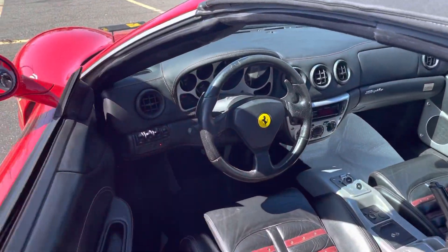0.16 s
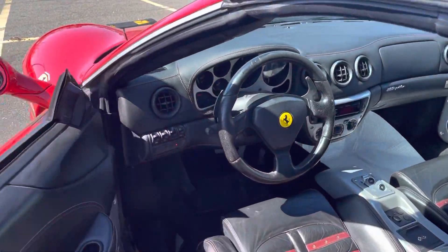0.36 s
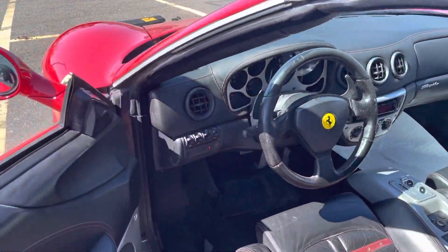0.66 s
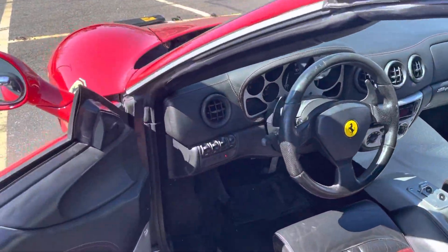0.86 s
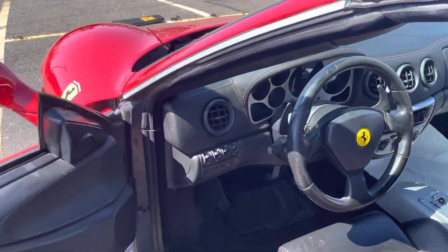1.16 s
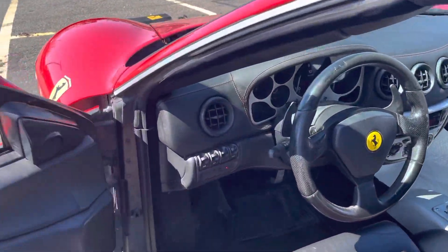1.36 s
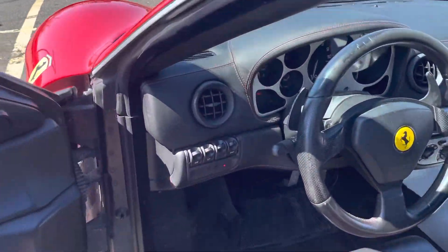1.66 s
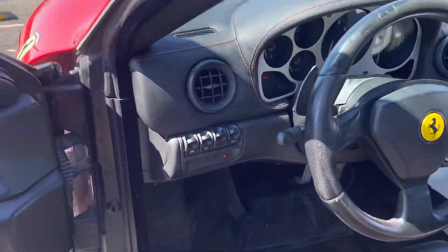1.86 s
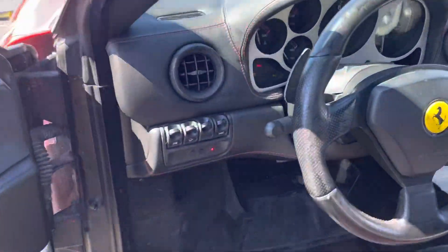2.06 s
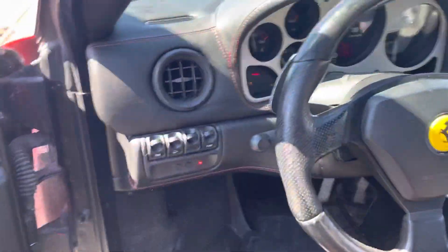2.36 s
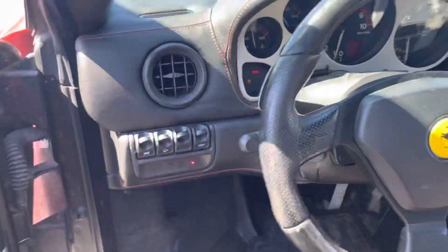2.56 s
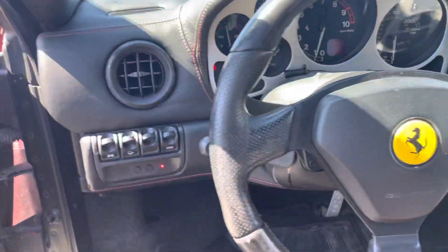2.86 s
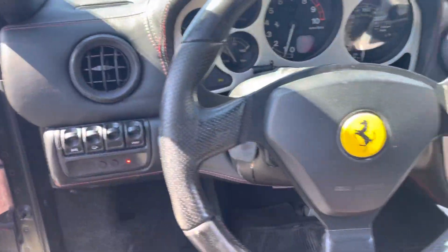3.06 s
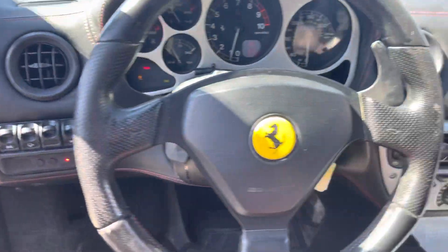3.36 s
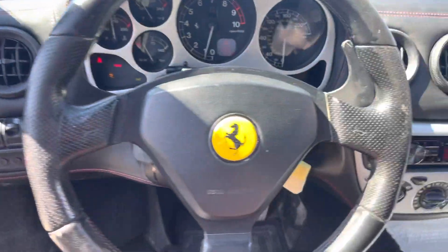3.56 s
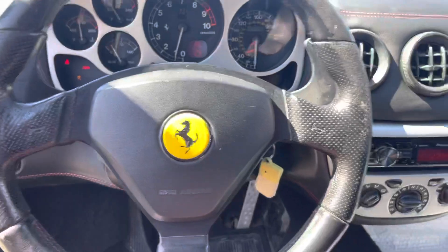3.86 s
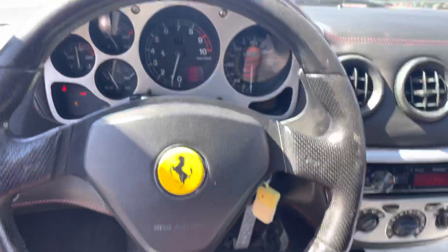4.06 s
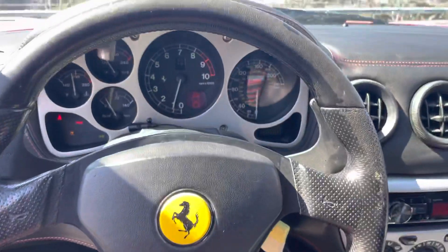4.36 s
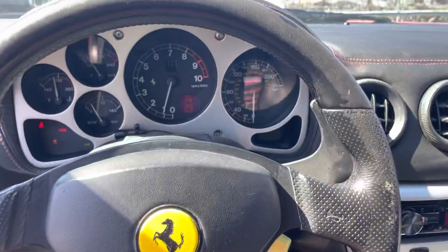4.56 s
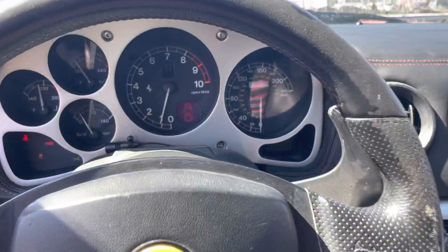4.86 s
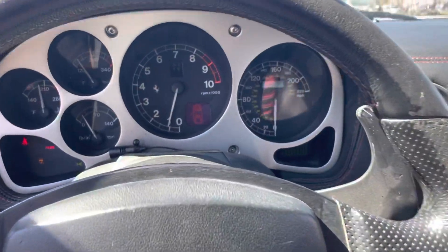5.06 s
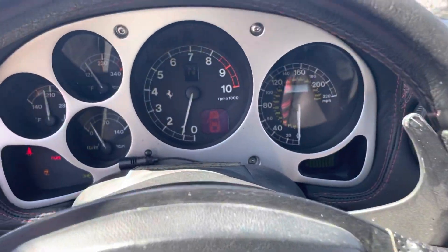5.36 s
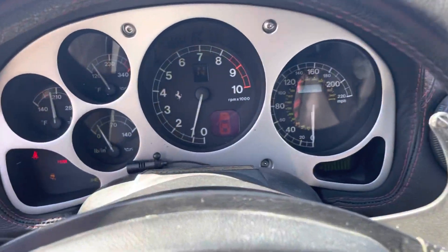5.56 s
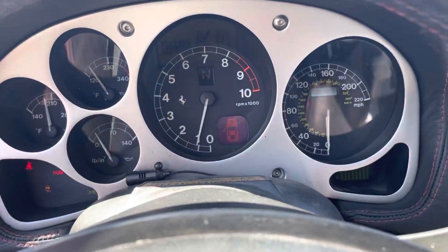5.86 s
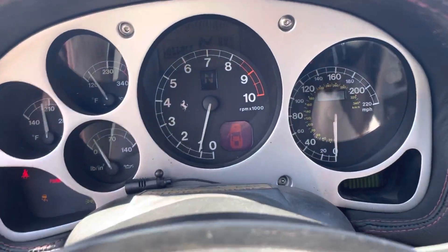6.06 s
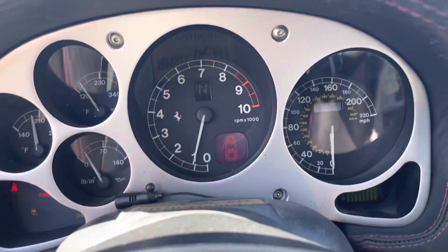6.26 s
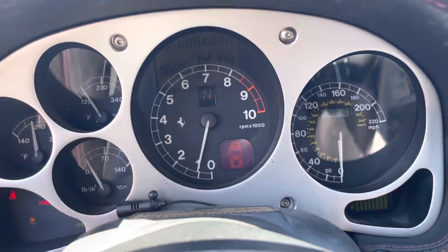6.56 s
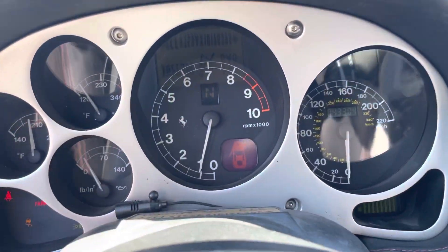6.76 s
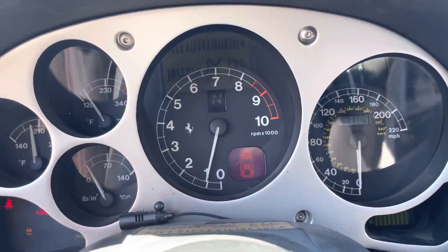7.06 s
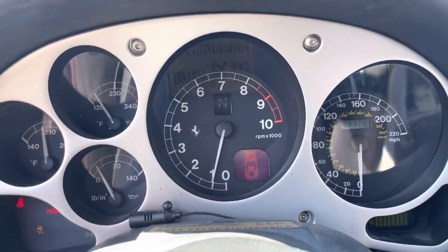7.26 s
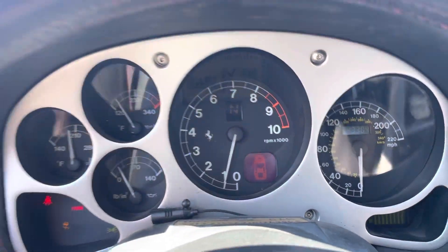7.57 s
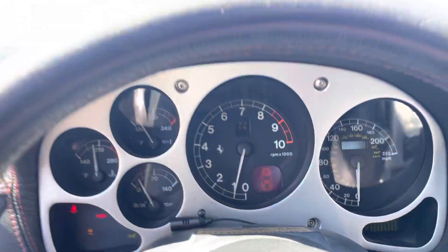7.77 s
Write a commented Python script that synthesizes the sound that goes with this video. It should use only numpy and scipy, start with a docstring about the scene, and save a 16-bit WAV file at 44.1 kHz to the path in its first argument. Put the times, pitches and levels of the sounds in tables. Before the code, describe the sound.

A sports car idles with a deep steady drone and whirring belts; wind buffets the microphone, a door clicks once, then the cabin muffles everything.

```python
"""Open parking lot: a V8 sports car idles while the microphone moves in through the opening driver's door.
Locked exhaust tones drone at the firing rate over a burble of uneven pulses; noise-made belts and valve gear
whirr in step with the engine, the covers sing as narrow resonances and a thin belt whine follows the speed.
Turbulent noise and short eddies buffet the microphone until the cabin shelters it.
The door clicks once; struck ticks, soft knocks, bumps and sleeve rustles sound close by."""
import sys
import numpy as np
from scipy import signal
from scipy.fft import rfft, irfft, next_fast_len
from scipy.io import wavfile
from scipy.ndimage import uniform_filter1d

SR = 44100
rng = np.random.default_rng(int(sys.argv[2]) if len(sys.argv) > 2 else 0)


def materialize(psi):
    """Save the field psi as 16-bit PCM at rate SR to the path in sys.argv[1].

    A 1-D psi becomes a single channel; in a 2-D psi each row is a channel.
    """
    bounded = np.clip(np.atleast_2d(psi).T, -1, 1)
    quanta = np.round(bounded * 32767).astype(np.int16)
    wavfile.write(sys.argv[1], SR, quanta)


N = 349272
TIME = np.arange(N) / SR


def from_db(db):
    """Turn decibels into amplitude gain."""
    return 10 ** (np.asarray(db) / 20)


def rms_one(x):
    """Scale to unit power."""
    return x / np.sqrt(np.mean(x ** 2) + 1e-20)


def in_time(rows):
    """Draw each column of an automation curve, sample by sample."""
    seconds, *columns = np.transpose(rows)
    return [np.interp(TIME, seconds, column) for column in columns]


def bell(s, length_s):
    """A smooth rise to 1 and back."""
    return np.exp(-(2 * (TIME - s) / length_s) ** 2)


def plateau(s, length_s):
    """A rise to 1 that holds for a while and falls back."""
    return np.exp(-(2 * (TIME - s) / length_s) ** 4 / 2)


def swells(rows):
    """Add smooth brief rises, one for each row (time [s], length [s], level [dB])."""
    return sum(from_db(db) * bell(s, length_s) for s, length_s, db in rows)


def drift(rate):
    """Slow random wander with spread 1; a higher rate [Hz] wanders faster."""
    step = 40    # the wander is drawn at every 40th sample, then joined by lines
    r = np.exp(-2 * step * np.pi * rate / SR)
    settle = 2000
    noise = rng.standard_normal(N // step + settle + 2)
    slow = signal.lfilter([1], [1, -2 * r, r * r], noise)[settle:]
    return np.interp(np.arange(N) / step, np.arange(len(slow)), rms_one(slow))


def with_diffuse(x, diffuse_db):
    """A sound shared by both ports, plus diffuse noise that differs between them."""
    return rms_one(rms_one(x) + from_db(diffuse_db) * rng.standard_normal((2, N)))


def stereo_noise(diffuse_db):
    """White noise, partly alike at the two ports."""
    return with_diffuse(rng.standard_normal(N), diffuse_db)


def colour(x, spectrum):
    """Give a signal a smooth spectrum; unit power."""
    size = next_fast_len(N)
    hz, db = np.transpose(spectrum)
    log_hz = np.log(np.fft.rfftfreq(size, 1 / SR) + 1)
    gain = from_db(np.interp(log_hz, np.log(hz), db, left=-90, right=-90))
    return rms_one(irfft(rfft(x, size) * gain, size)[..., :N])


def evened(x, even_s):
    """Hold a noise at an even strength over the given span."""
    power = uniform_filter1d(np.mean(x ** 2, axis=0), size=int(even_s * SR))
    return x / np.sqrt(power + 1e-12)


def resonate(x, hz, width_hz):
    """Two-pole resonance with gain 1 on top."""
    r = np.exp(-np.pi * width_hz / SR)
    feed = np.array([1, 0, -1]) * (1 - r * r) / 2
    feedback = [1, -2 * r * np.cos(2 * np.pi * hz / SR), r * r]
    return signal.lfilter(feed, feedback, x + 1e-18)


def sing(shaking, hz, width_hz):
    """One resonance kept ringing at an even strength."""
    ringing = resonate(resonate(shaking, hz, width_hz), hz, 4 * width_hz)
    return evened(ringing, even_s=0.089)


def pan(db):
    """Channel gains for a left-right difference; positive leans left."""
    return from_db(np.array([[db], [-db]]) / 2)


def in_cabin():
    """Share of the way in through the door, 0 to 1."""
    return np.interp(TIME, [1.8, 3.0], [0, 1])


# how far the left microphone port leads the right for sound from the car: (frequency [Hz], lead [rad])
PORT_PHASE = [(0, 0), (180, .15), (300, .9), (500, 1.6), (860, 1.75), (1120, 1.4), (1460, 2.9), (2000, 5.5),
              (2500, 6.2), (3500, 7), (5000, 6.3), (7500, 9.4), (10500, 12.6), (12500, 12.9), (14500, 15.7)]


def at_ports(x):
    """Airborne sound bends round the microphone body and reaches its ports out of step."""
    size = next_fast_len(N)
    lead = np.interp(np.fft.rfftfreq(size, 1 / SR), *np.transpose(PORT_PHASE))
    turn = np.exp(.5j * np.array([lead, -lead]))
    return irfft(rfft(x, size) * turn, size)[:, :N]


# weaker lines of the exhaust and the belt drive:
# (multiple of the firing rate [ratio], level against the firing tone's curve [dB])
OVERTONES = [(0.499, -24), (.75, -24.5), (1.248, -32), (1.5, -15.5), (2.499, -34.5), (2.75, -33.5),
             (3.001, -28), (3.25, -34), (3.499, -31), (4.5, -33), (4.999, -37.5), (5.999, -46.5),
             (6.169, -39.5), (6.5, -44.5), (6.75, -43), (8.5, -42.5)]
# cabin resonances that lift a line as it slides through: (frequency [Hz], width [Hz], lift [dB])
CABIN = [(111.8, 3.6, 8), (307, 10, 10), (460.4, 5, 6.5)]
# a clean hum two octaves above the firing tone fills the space behind the steering wheel:
# (time [s], level [dB])
HUM = [(0, -42), (3.0, -48.5), (3.5, -46.5), (3.85, -38.5), (5.0, -34.5), (5.9, -33.5), (6.5, -38),
       (7.0, -36), (7.9, -38.5)]


def drone(rate, firings, tone_db, octave_db):
    """Clean exhaust lines, locked to the firings; the weak ones waver with uneven combustion."""
    angle = 2 * np.pi * firings + 0.041 * drift(27)
    hum_db, = in_time(HUM)
    tone_level_db = tone_db + 0.97 + 0.12 * drift(1.8) + 0.15 * drift(13)
    tone = from_db(tone_level_db) * np.cos(angle)
    octave = from_db(octave_db + 2.0 + 0.18 * drift(30)) * np.cos(2 * angle + np.pi / 3)
    hum = from_db(hum_db + 0.6 * drift(6)) * np.cos(4 * angle)
    # in the cabin the boom leans to the right
    out = tone * pan(-3.0) ** in_cabin() + (octave + hum) * pan(-0.46)
    for multiple, db in OVERTONES:
        line_hz = multiple * rate
        lift_db = sum(peak_db / (1 + (2 * (line_hz - hz) / width_hz) ** 2)
                      for hz, width_hz, peak_db in CABIN)
        line = np.cos(multiple * angle + 2 * np.pi * rng.random() + .2 * drift(5))
        out = out + from_db(tone_db + db + lift_db + 1.1 * drift(8.0)) * line * pan(-0.28)
    return np.sqrt(2) * out    # the levels are RMS


# tone of the exhaust puffs: (frequency [Hz], relative level [dB])
BURBLE = [(18, -20.5), (30, -14.5), (42, -2), (60, 6), (90, -9.5), (130, 0.5), (155, -0.5), (185, -12.5),
          (230, -6.5), (270, -13.5), (315, -12.5), (350, -20), (405, -36), (520, -38.5), (900, -49.5)]


def burble(firings, tone_db, cylinder_share=0.66, level_db=-11.0):
    """No two firings are alike: each cylinder has its own strength, and chance adds to it."""
    at = np.flatnonzero(np.diff(np.floor(firings)))
    cylinders = rms_one(signal.detrend(rng.standard_normal(size=8), type="constant"))
    pulses = np.zeros(N)
    pulses[at] = cylinder_share * np.resize(cylinders, len(at)) + rng.standard_normal(len(at))
    gas = rng.standard_normal(N) * (1 + 0.17 * np.cos(2 * np.pi * firings))
    puffs = colour(with_diffuse(rms_one(pulses) + 1.2 * gas, diffuse_db=-9), BURBLE)
    # the burble follows the drone's level half way, smoothed over a second
    nearness_db = .5 * (uniform_filter1d(tone_db, size=SR) + np.median(tone_db))
    return from_db(level_db + nearness_db) * puffs * pan(-1.4)


# short echoes off the glass and trim: (delay [s], level [dB])
REFLECTIONS = [(.0031, -26), (.0068, -9.5), (0.0112, -14.5)]


def reflected(x, sway_s=0.00022):
    """Near surfaces comb the sound; the pattern shifts as the microphone sways."""
    out = x
    for delay_s, db in REFLECTIONS:
        earlier = TIME - delay_s - sway_s * drift(0.36)
        echo = np.array([np.interp(earlier, TIME, side) for side in x])
        out = out + from_db(db) * echo
    return rms_one(out)


# tone of the belts and pulleys: (frequency [Hz], relative level [dB])
WHIRR = [(150, -0.5), (400, 0), (600, 5.5), (850, 0.5), (1100, 3), (1350, -6.5), (1750, -4.5), (2300, -13),
         (3000, -16), (3800, -19.5), (5500, -44.5)]
# tone of their airy top: (frequency [Hz], relative level [dB])
HISS = [(2000, -9), (3300, 2), (5200, 4.5), (6200, 2), (7200, -13.5), (8500, -6), (10500, -4),
        (12500, -10.5), (15500, -17)]
WHIRR_DB, HISS_DB = -38, -57.5   # before screening
HISS_SCREENING = 1.13   # dB of hiss lost for each dB of screening


def engine_bay(firings, screening_db):
    """Belts and pulleys whirr and hiss; the whirr throbs at one, two and eight firings."""
    half_turn = np.pi * firings     # this throb repeats every second beat of the drone
    beat = 1 + 0.056 * np.cos(half_turn) + 0.18 * np.cos(half_turn / 4) + 0.032 * np.cos(2 * half_turn)
    whirr = colour(reflected(beat * stereo_noise(diffuse_db=2.5)), WHIRR)
    whirr = from_db(WHIRR_DB + screening_db + .5 * drift(3.6)) * whirr
    hiss = colour(stereo_noise(diffuse_db=-10.5), HISS)
    hiss = from_db(HISS_DB + HISS_SCREENING * screening_db + .5 * drift(13)) * hiss
    return whirr * pan(1.2) ** in_cabin() + hiss * pan(0.3)


# tone of the valve gear: (frequency [Hz], relative level [dB])
VALVES = [(1500, -23.5), (2150, 3.5), (2550, 0.5), (3250, -3.5), (3700, -20), (5000, -29.5)]


def valves(firings, screening_db, level_db=-56.0, screened_share=0.41, coarse_db=3.5, throb_db=-1.4):
    """Valve gear rustles coarsely in step; it also comes through the bulkhead, so is screened less."""
    half_turn = np.pi * firings
    beat_db = throb_db * (np.cos(half_turn) + np.cos(half_turn / 2) + np.cos(half_turn / 4))
    ticking = stereo_noise(diffuse_db=-1.5) * from_db(beat_db + coarse_db * drift(120))
    return from_db(level_db + screened_share * screening_db) * colour(ticking, VALVES) * pan(1.2)


# resonances of the engine covers, always faintly singing: (frequency [Hz], width [Hz], level [dB])
COVERS = [(1075, 36, -64), (1142, 6.7, -60.5), (2040, 37, -61), (2232, 26, -65.5), (2500, 74, -68.5)]
# single resonances stand out where the microphone passes through their loud spots:
# (time [s], length [s], frequency [Hz], width [Hz], level [dB], diffuse share [dB])
WHINES = [(0.664, 0.75, 1045, 46, -38.5, -0.5), (2.047, 0.27, 1125, 38, -41, -4.5),
          (2.574, 0.62, 1080, 17.5, -42.5, -11), (3.223, 0.55, 1086, 8.7, -43.5, -8.5),
          (5.132, 1, 1083, 23, -48, 0.5), (6.05, 0.57, 1090, 45, -55.5, 5),
          (7.88, 0.44, 1070, 42, -45, 0.5), (0.706, 0.32, 1970, 39, -50, 3),
          (2.33, 0.26, 2060, 8, -52, -12), (2.5, .14, 2040, 15, -57, -14),
          (3.214, 0.33, 1998, 8.2, -54.5, -15), (3.688, .2, 2026, 41, -55, -6),
          (4.203, 0.49, 1995, 20, -62, -6.5), (4.308, 0.76, 2040, 19, -60.5, -1.5),
          (7.147, 0.6, 2087, 43, -61.5, -3), (5.2, 0.92, 2204, 70, -61, -4),
          (6.16, 0.23, 4340, 190, -68, -3.5)]


def covers(firings, throb_db=2.6, slow_throb_db=0.9, cycle_throb_db=-1.0):
    """The covers sing a rough whine that throbs with the engine; now one resonance stands out, now another."""
    half_turn = np.pi * firings
    throb = rms_one(from_db(throb_db * np.cos(half_turn) + slow_throb_db * np.cos(half_turn / 2)
                            + cycle_throb_db * np.cos(half_turn / 4)))
    far = stereo_noise(diffuse_db=-6.5)
    direct, diffuse = rng.standard_normal(N), rng.standard_normal((2, N))
    out = sum(from_db(db) * sing(far, hz, width_hz) for hz, width_hz, db in COVERS)
    for s, length_s, hz, width_hz, db, diffuse_db in WHINES:
        shaking = direct + from_db(diffuse_db) * diffuse
        out = out + from_db(db) * plateau(s, length_s) * sing(shaking, hz, width_hz)
    return throb * out * pan(4.7) ** in_cabin()


# level of the belt-driven shaft's whine: (time [s], level [dB])
BELT = [(0, -52), (.8, -47), (2.0, -59), (3.4, -64.5), (3.65, -68), (4.3, -54.5), (5.0, -53.5), (5.6, -69),
        (6.1, -79)]
BELT_MULTIPLE = 18.8   # whine cycles per firing


def belt(firings, slip_cycles=0.2, flicker_db=2):
    """A thin whine that rises and sinks with the idle speed, roughened by belt slip."""
    level_db, = in_time(BELT)
    whine = np.cos(2 * np.pi * (BELT_MULTIPLE * firings + slip_cycles * drift(24)))
    return np.sqrt(2) * from_db(level_db + flicker_db * drift(8.8)) * whine


# the breeze drops behind the open door, flares briefly and dies in the cabin: (time [s], level [dB])
BREEZE = [(0, -14), (1.0, -18.5), (1.35, -24), (1.9, -28), (2.55, -20.5), (2.72, -24.5), (2.9, -26.5),
          (3.3, -31)]
# gusts on top of the breeze, scaled by the growths below: (time [s], length [s], gust strength [dB])
GUSTS = [(0.04, 0.1, 2), (0.556, 0.059, 4.5), (0.685, 0.13, 6.5), (0.816, 0.12, 7.5), (1.048, 0.15, 5.5),
         (1.225, 0.35, 4.5), (1.358, 0.062, 7), (1.547, 0.23, 7), (2.67, 0.05, 9)]
# lulls between them; a negative dip is a slight lift: (time [s], length [s], dip [dB])
LULLS = [(0.183, 0.034, 3.5), (0.47, 0.061, 2.5), (0.626, 0.036, 5.5), (0.848, 0.038, 1.5),
         (1.337, 0.051, 6), (1.487, 0.027, 20), (2.032, 0.071, -1.5), (2.224, 0.034, 2), (2.552, 0.028, 5)]
# deep tone of the wind: (frequency [Hz], relative level [dB])
RUMBLE = [(15, -22.5), (30, -19.5), (55, 5), (80, 6.5), (120, 4.5), (180, -6.5), (300, -32), (600, -48.5)]
# fluttering tone of the wind: (frequency [Hz], relative level [dB])
FLUTTER = [(80, -17.5), (160, -0.5), (250, 3.5), (320, -2.5), (420, -4.5), (560, -13.5), (750, -18.5),
           (1400, -19), (3000, -58)]
FLUTTER_DB = -11   # against the rumble, without gusts
FLUTTER_GROWTH, RUMBLE_GROWTH = 1.75, 0.27   # dB for each dB of gust


def wind(lumpy_db=2.5, choppy_db=-1.0, gust_top_hz=600):
    """Ragged turbulence at the ports: gusts raise low flutter more than rumble; the cabin shelters both."""
    breeze_db, = in_time(BREEZE)
    gust_db = sum(db * bell(s, length_s) for s, length_s, db in GUSTS)
    lull_db = sum(db * bell(s, length_s) for s, length_s, db in LULLS)
    choppy = stereo_noise(diffuse_db=0.5) * from_db(choppy_db * drift(41))
    rumble = evened(colour(choppy, RUMBLE), even_s=0.18)
    lumpy = stereo_noise(diffuse_db=2.5) * from_db(lumpy_db * drift(55))
    flutter = evened(colour(lumpy, FLUTTER), even_s=.07)
    # gusts lift only the flutter's low part
    low = signal.sosfiltfilt(signal.butter(3, gust_top_hz, fs=SR, output="sos"), flutter)
    flutter = flutter + (from_db(FLUTTER_GROWTH * gust_db) - 1) * low
    turbulence = from_db(RUMBLE_GROWTH * gust_db) * rumble + from_db(FLUTTER_DB) * flutter
    return from_db(breeze_db - lull_db) * turbulence


# single eddies that hit the microphone: (time [s], strength before the common level [dB], pitch [Hz])
BUFFETS = [(0.045, -4.5, 388), (0.05, -4, 183), (0.154, -9.5, 273), (.16, -1, 106), (0.263, -9, 202.5),
           (0.521, -9, 210), (.589, -7.5, 286), (.664, -5.5, 194), (0.67, -9.5, 366), (.69, -9, 330),
           (.708, -4, 345), (.716, -3, 110), (0.724, -2.5, 345), (0.758, -5, 343), (0.793, -4.5, 420),
           (0.808, 1, 420), (.814, 3, 244), (.862, -8, 350), (1.023, -4.5, 363), (1.04, -13, 416),
           (1.044, -3, 96), (1.059, -11, 320), (1.087, -6, 294), (1.101, -10.5, 376), (1.14, -8.5, 358),
           (1.17, -9, 282), (1.251, -12, 317), (1.295, -13.5, 344), (1.357, -10.5, 430), (1.364, -8, 255),
           (1.509, -9.5, 322), (1.518, -11, 268), (1.535, -6, 257), (1.564, -17, 129), (1.574, -11, 278),
           (1.64, -14.5, 503), (2.044, -6.5, 112.4), (2.087, -20.5, 415), (2.122, -20, 262),
           (2.137, -6, 126), (2.259, -10, 130), (2.261, -16.5, 322), (2.333, -17.5, 377), (2.356, -10, 144),
           (2.432, -6, 131), (2.449, -17, 290), (2.524, -5, 124), (2.542, -9, 205), (2.623, -14.5, 292),
           (2.671, -5, 292), (2.682, -3, 265)]


def buffets(level_db=-4.0, rise_turns=0.82, fall_turns=1.05, sag=0.081):
    """An eddy hits abruptly and shakes the pressure for about two cycles, slowing as it passes."""
    out = np.zeros((2, N))
    chances = rng.uniform(-0.94, 1, (len(BUFFETS), 2))
    for (s, db, hz), (phase, lean) in zip(BUFFETS, chances):
        near = slice(max(int((s - 4 / hz) * SR), 0), int((s + 4 / hz) * SR))
        turns = (TIME[near] - s) * hz
        envelope = np.exp(-(turns / np.where(turns < 0, rise_turns, fall_turns)) ** 2)
        eddy = envelope * np.sin(2 * np.pi * (turns - sag * turns ** 2 + phase))
        out[:, near] += from_db(db + level_db) * eddy * pan(3 * lean)
    return out


# soft low bumps while the microphone is moved: (time [s], length [s], level [dB])
BUMPS = [(4.35, 0.14, -20.5), (4.621, 0.16, -20.5), (4.743, 0.055, -15), (4.88, 0.041, -22.5),
         (6.66, 0.099, -29)]
# tone of the bumps: (frequency [Hz], relative level [dB])
BUMP = [(18, -16.5), (36, -2), (60, 6), (110, -3.5), (170, -9), (300, -34), (600, -47.5)]
# hand and sleeve brushing the trim: (time [s], length [s], level [dB])
RUSTLES = [(.52, 0.049, -51.5), (2.78, 0.65, -60), (3.815, 0.062, -49), (4.78, 0.13, -64),
           (6.12, 0.053, -64)]
# tone of the brushing: (frequency [Hz], relative level [dB])
RUSTLE = [(1000, -18.5), (3000, 4.5), (5500, -2), (10000, -10.5), (15500, -11)]


def handling():
    """Low bumps through the grip and grainy brushes against the trim."""
    thud = evened(colour(stereo_noise(diffuse_db=-11.0), BUMP), even_s=0.14)
    grains = stereo_noise(diffuse_db=-0.5) * from_db(3.6 * drift(150))
    return swells(BUMPS) * thud + swells(RUSTLES) * colour(grains, RUSTLE)


# door click, light ticks of the trim, and one short rattle:
# (time [s], onset strength before the common level [dB], centre [Hz], decay constant [s])
CLICKS = [(.691, -28, 4330, 0.0012), (0.6945, -45, 7450, 0.0025), (.7025, -44, 5000, .003),
          (.733, -41, 1900, 0.0027), (.741, -44.5, 10000, .004), (0.8185, -45, 9000, .003),
          (1.6677, -46, 7100, 0.0024), (2.0603, -49, 5400, 0.0016), (3.592, -45.5, 4500, 0.0058),
          (3.67, -50, 5000, 0.0037), (3.769, -40, 3100, 0.0035), (3.7885, -40, 3000, .002),
          (3.7945, -37.5, 4700, 0.0041), (3.818, -44, 4470, .002), (3.823, -43, 5300, 0.0027),
          (3.833, -38.5, 1650, 0.0045), (3.8335, -52, 10000, .002), (4.2475, -39, 7040, 0.0031),
          (5.047, -49, 5100, .002)]
# what the door fittings and trim ring with: (frequency [Hz], relative level [dB], 60 dB decay [s])
TRIM = [(1400, 1, 0.022), (3380, 12.5, 0.0088), (4830, 12, 0.031), (5300, 14, 0.019), (6100, 0, 0.017),
        (9400, -9, 0.0047), (11200, -8, .012)]


def clicks(tail_s=0.011, tail_db=-17, ring_db=-7, level_db=-3, diffuse_db=-5):
    """Each contact is a dry gritty crack with a brief ring of the fittings."""
    out, t = np.zeros((2, N)), TIME[:SR // 10]
    for s, db, hz, decay_s in CLICKS:
        grit = rng.standard_normal(len(t)) + from_db(diffuse_db) * rng.standard_normal((2, len(t)))
        fade = np.exp(-t / decay_s) + from_db(tail_db) * np.exp(-t / tail_s)
        crack = resonate(grit * fade, hz, hz)
        rings = sum(from_db(mode_db) * resonate(crack, mode_hz, np.log(1000) / (np.pi * t60_s))
                    for mode_hz, mode_db, t60_s in TRIM)
        hit = rms_one(crack) + from_db(ring_db) * rms_one(rings)
        at = round(s * SR)
        onset = np.std(hit[:, :SR // 500])    # the level is set on the first 2 ms
        out[:, at:at + len(t)] += from_db(db + level_db) * hit / onset
    return out * pan(0.57)


RUSH_S, RUSH_LENGTH_S, RUSH_DB, RUSH_HZ, RUSH_WIDTH_HZ = 1.61, 0.9, -42, 760, 370


def door_rush():
    """A soft hollow rush of air in the gap of the open door as the microphone passes its edge."""
    air = resonate(stereo_noise(diffuse_db=-3.0), RUSH_HZ, RUSH_WIDTH_HZ)
    air = resonate(air, RUSH_HZ, 2 * RUSH_WIDTH_HZ)
    return from_db(RUSH_DB + 2.5 * drift(27)) * bell(RUSH_S, RUSH_LENGTH_S) * rms_one(air)


# dull knocks of the trim: (time [s], strength before the low-pass [dB], pitch [Hz])
KNOCKS = [(1.974, -20, 720), (1.984, -36, 620), (2.062, -26, 820), (3.833, -28, 1250), (5.473, -33, 660),
          (5.533, -32, 620), (5.633, -29, 700)]


def knocks(t60_s=.014, tap_hz=1500):
    """A soft tap sets a padded panel ringing for a few cycles."""
    out, t = np.zeros(N), TIME[:SR // 10]
    for s, db, hz in KNOCKS:
        at = round(s * SR)
        out[at:at + len(t)] += from_db(db - 60 * t / t60_s) * np.sin(2 * np.pi * hz * t)
    return signal.sosfilt(signal.butter(2, tap_hz, fs=SR, output="sos"), out)


# idle speed, which hunts a little, rises for a while and sinks back: (time [s], firing rate [1/s])
SPEED = [(0, 70.3), (2.1, 69.2), (2.97, 68.7), (3.2, 70.4), (3.55, 70.2), (3.75, 72.3), (4.3, 74.7),
         (4.9, 73.7), (5.85, 72.9), (6.4, 71), (6.6, 71.5), (7.35, 68.2), (7.92, 68.4)]
# the exhaust's standing waves along the microphone's path, with a node at the door sill; drone() trims both:
# (time [s], firing tone level [dB], level of its octave [dB])
DRONE = [(0, -17.5, -30.5), (1.05, -19.5, -37), (1.3, -30.5, -41), (1.7, -33, -44.5), (2.05, -41.5, -26.5),
         (2.5, -30, -27), (2.95, -21, -19.5), (3.2, -18.5, -24), (4.2, -19, -24.5), (6.3, -16.5, -23.5),
         (7.85, -17, -20)]
# the engine bay is screened more and more as the microphone enters the cabin, easing at the end:
# (time [s], level change [dB])
SCREENING = [(0, 0.5), (1.5, 0), (2.4, -1.5), (3.7, -2.5), (5.3, -6), (6.9, -8.5), (7.9, -6.5)]


def scene():
    """One engine speed drives exhaust and engine bay; contacts sound close by, wind acts right at the ports."""
    rate, = in_time(SPEED)
    tone_db, octave_db = in_time(DRONE)
    screening_db, = in_time(SCREENING)
    firings = np.cumsum(rate) / SR    # running count of firings
    exhaust = drone(rate, firings, tone_db, octave_db) + burble(firings, tone_db)
    machinery = engine_bay(firings, screening_db) + valves(firings, screening_db)
    machinery = machinery + covers(firings) + belt(firings)
    air = wind() + buffets() + door_rush()
    contacts = handling() + clicks() + knocks() * pan(3.5)
    return at_ports(exhaust + machinery) + air + contacts


CUTOFF_HZ = 15800


def record(dry):
    """The strongest peaks are rounded off below 0.95; the top is cut steeply."""
    rounded = dry / (1 + (dry / .95) ** 8) ** (1 / 8)
    return signal.sosfilt(signal.cheby2(12, 70, CUTOFF_HZ, fs=SR, output="sos"), rounded)


dry = scene()
out = record(dry)
materialize(out)
```